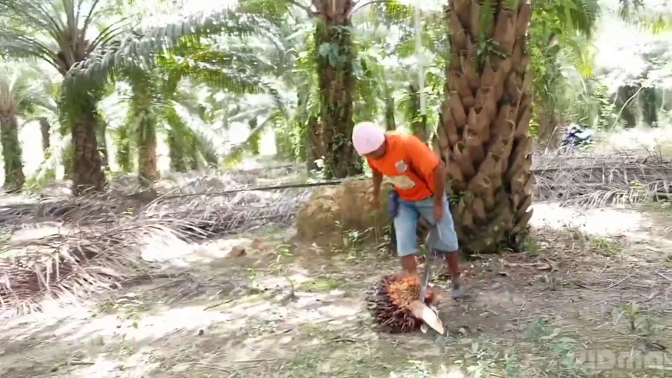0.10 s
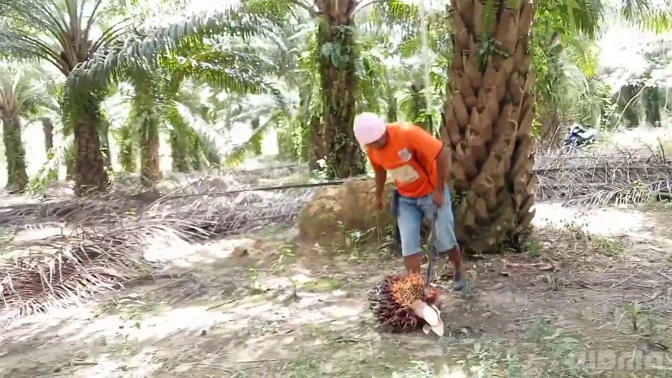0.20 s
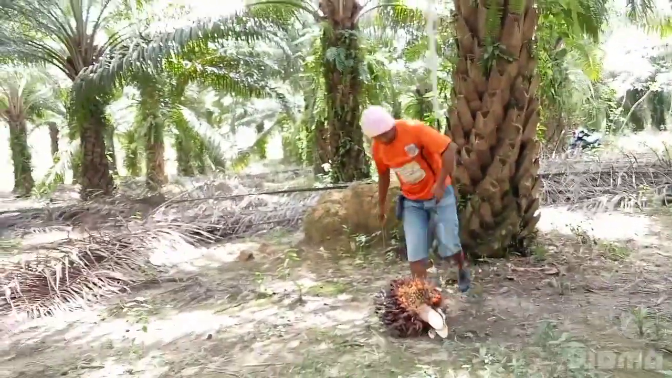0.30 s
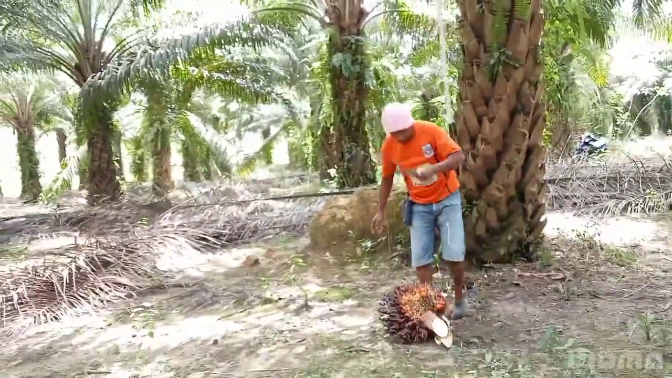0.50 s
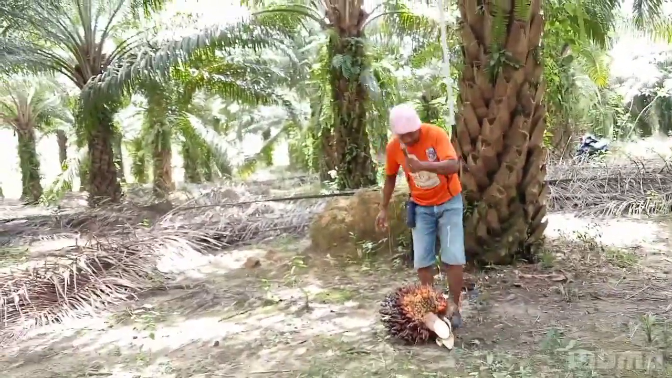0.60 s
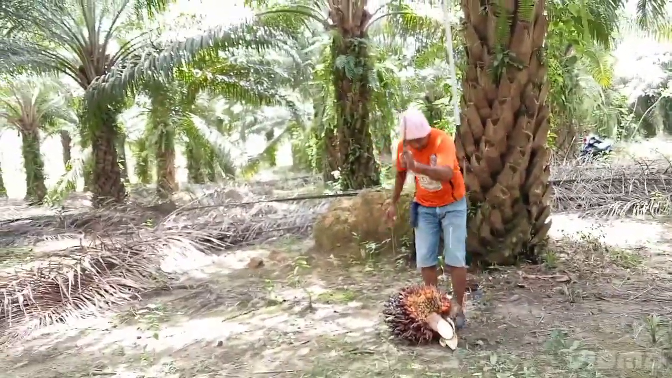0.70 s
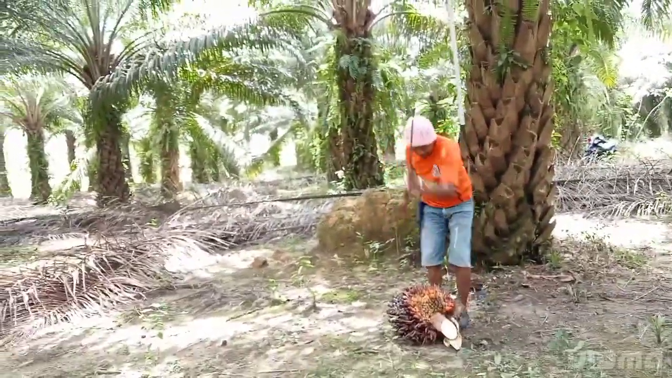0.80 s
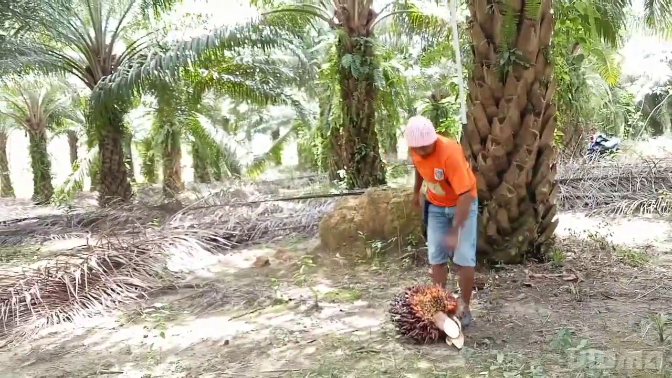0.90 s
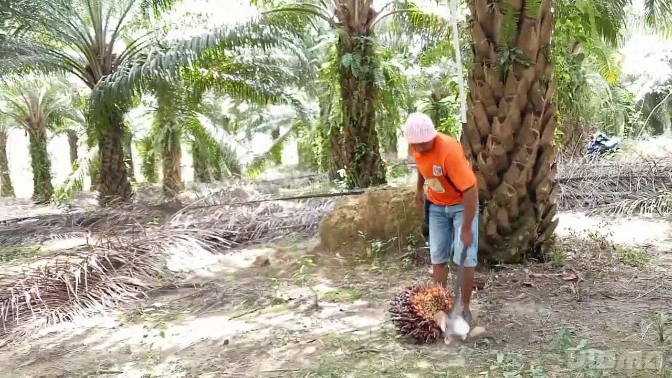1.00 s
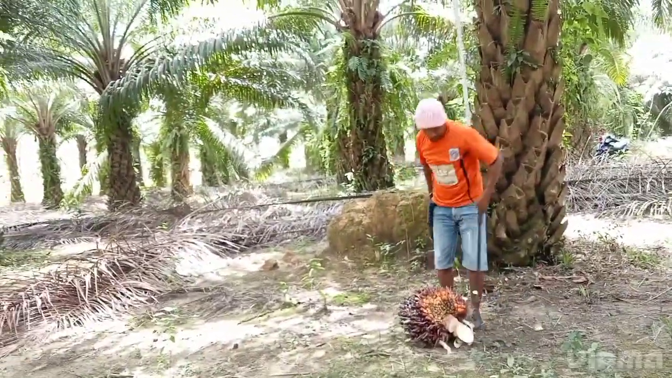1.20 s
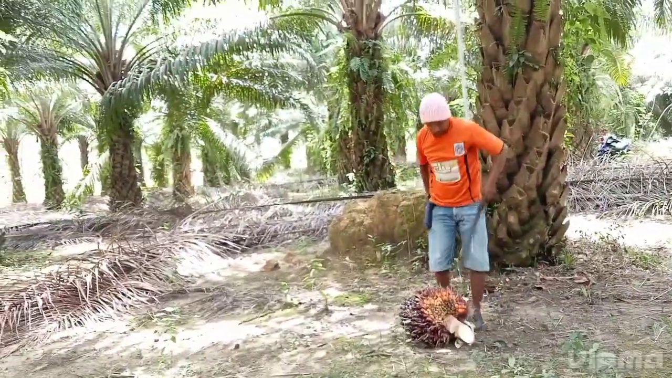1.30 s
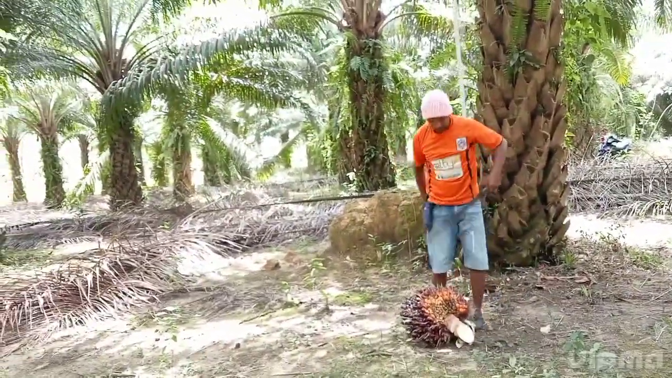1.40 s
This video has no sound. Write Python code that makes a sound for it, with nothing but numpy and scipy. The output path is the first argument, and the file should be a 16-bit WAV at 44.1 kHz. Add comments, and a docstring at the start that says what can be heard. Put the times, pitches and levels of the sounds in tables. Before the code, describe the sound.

A tiny tick and scuff, then a loud tearing chop with scattered echoes off trunks; light scuffs, then a second, woodier chop. High buzzing insects dip briefly afterwards, over a distant idling engine and low rumble.

```python
"""Insects drone high over a far engine and faint rumble and hiss, all made of noise bands and sine orders.
A small tick and one soft scuff lead to a harvester's first chop into a palm fruit bunch's stalk.
The long-poled blade tears fibres (noise burst), rings and thocks (decaying sines); the trunks scatter it back.
More scuffs come between and after the chops; the second chop has a weaker crack but a louder thock.
Then the insects are ducked briefly by the recorder's gain, and a thin, wavering whistle fades."""
import sys
import numpy as np
from scipy import signal
from scipy.fft import rfft, irfft
from scipy.io import wavfile
from scipy.ndimage import uniform_filter1d

SR = 44100
rng = np.random.default_rng(int(sys.argv[2]) if len(sys.argv) > 2 else 0)


def master_out(mix):
    """Clip the mix to full scale and print it as 16-bit PCM to the path in sys.argv[1]."""
    frames = np.transpose(np.atleast_2d(mix))
    ceiling = np.clip(frames, -1, 1)
    pcm = np.round(ceiling * 32767).astype(np.int16)
    wavfile.write(sys.argv[1], SR, pcm)


N = 63945

# chops: t/s, crack level/dB, crack length/s, crack tilt/(dB/octave), blade f/Hz, blade level/dB,
# thock and bunch delay/s, thock f/Hz, thock level/dB, pole gain/dB, scatter gain/dB
CHOP_EVENTS = [(0.2075, 1.5, 0.0074, -0.42, 3275, -9.5, 0.00065, 517, -18, 0.5, 2.5),
               (1.1268, -2.5, 0.0074, -0.54, 3387, -8.5, 0.00339, 610, -8, -2, 0)]
# tearing fibres, before tilt and chop level: f/Hz, density/(dB/Hz)
CRACK_SPECTRUM = [(90, -71.5), (150, -62.5), (400, -51.5), (800, -65), (1300, -54), (2000, -59.5),
                  (3300, -49), (4100, -63), (5400, -74), (6500, -63.5), (7600, -54), (10000, -59),
                  (12500, -61.5), (15000, -54.5)]
# modes of the fruit bunch: f/Hz, level/dB, T60/s
BUNCH_MODES = [(139, -37.5, 0.11), (293.6, -28, 0.13), (455.3, -25.5, 0.065), (748, -38.5, 0.11)]
# modes of the long pole, before spread and chop gain: f/Hz, level/dB, T60/s
POLE_MODES = [(1185, -44, .2), (1400, -46, .18), (1686, -46, .3), (2010, -48, .3), (2284, -47, .3),
              (2420, -47, .3), (2676, -38, .36), (2858, -43, .45), (3010, -45, .45), (3068, -45, .45)]
# echoes off trunks and fronds, before gains: f/Hz, density/(dB/Hz)
SCATTER_SPECTRUM = [(100, -81), (300, -68), (700, -69), (1200, -70), (1900, -62.5), (2800, -62),
                    (3400, -62.5), (4200, -73.5), (5400, -82.5), (7600, -67.5), (10000, -80.5),
                    (12500, -82.5), (15000, -77.5)]
# decay of those echoes: f/Hz, T60/s
SCATTER_DECAY = [(200, 0.16), (600, 0.2), (1400, 0.11), (3000, 0.31), (7500, .27), (14000, 0.29)]
# long wash from deep in the grove, before scatter gain: f/Hz, density/(dB/Hz)
WASH_SPECTRUM = [(300, -88), (1200, -88), (2000, -75.5), (2900, -70.5), (3500, -74), (4400, -85),
                 (5500, -91), (8000, -84), (13000, -101)]
# light tick of the tool: t/s, f/Hz, level/dB
TICK_EVENTS = [(0.148, 2970, -24)]
# snap of the tick, shape only: f/Hz, relative density/(dB/Hz)
SNAP_SPECTRUM = [(400, -102), (1300, -78), (3400, -96), (5000, -112), (8000, -102), (15000, -109)]
# scuffs on dry ground: centre t/s, Gaussian width/s, rustle gain/dB, thud level/dB
SCUFF_EVENTS = [(0.184, 0.024, 2.5, -55), (0.332, 0.009, 2.5, -51.5), (.415, 0.0059, -1.5, -80),
                (.76, 0.029, -3.5, -70), (1.095, 0.022, -5.5, -65), (1.215, 0.027, 6.5, -73),
                (1.35, 0.063, -8.5, -67)]
# rustle of a scuff, before its gain: f/Hz, density/(dB/Hz)
RUSTLE_SPECTRUM = [(200, -111.5), (600, -82.5), (1100, -91.5), (2400, -93.5), (3300, -84), (4500, -106),
                   (9000, -112)]
# thin far whistle: start t/s, end t/s, f/Hz, starting level/dB
WHISTLE_EVENTS = [(1.225, 1.405, 3406, -46.5)]
# insect chorus, before recorder gain: f/Hz, density/(dB/Hz)
CHORUS_SPECTRUM = [(5600, -120), (6050, -107), (6450, -91.5), (6750, -88), (7100, -74.5), (7450, -74.5),
                   (7900, -79.5), (8250, -99), (9500, -108), (11500, -124)]
# octave of the chorus, before recorder gain: f/Hz, density/(dB/Hz)
OCTAVE_SPECTRUM = [(12000, -122), (13200, -106), (13900, -102), (14600, -93), (15200, -89.5), (15600, -106)]
# recorder gain as heard on the insects, dipping after the second chop and recovering: t/s, gain/dB
RECORDER_GAIN = [(0, 1), (.25, 0.5), (.34, -1), (.5, 0.2), (1.08, 0.5), (1.2, -3), (1.29, -4.5), (1.36, .5),
                 (1.45, 2)]
# far idling engine: multiple of firing rate, level/dB
ENGINE_ORDERS = [(5, -61.5), (6, -63), (7, -64), (8, -65), (9, -68), (10, -69), (11, -63), (12, -61),
                 (14, -71)]
# distant rumble and air: f/Hz, density/(dB/Hz)
AIR_SPECTRUM = [(25, -96), (45, -96), (65, -82.5), (85, -78.5), (115, -84), (175, -87), (240, -90),
                (400, -95), (600, -98), (1100, -102), (2200, -99), (3300, -97), (4200, -109), (5200, -119),
                (12000, -121)]

CRACK_ATTACK_S, CRACK_RELEASE_S, CRACK_GRAIN_DB = 0.001, 0.0012, -0.5
BLADE_RISE_S, BLADE_T60_S = 0.0024, 0.012
THOCK_RISE_S, THOCK_T60_S = 0.0014, 0.034
THOCK_SHARP_RATIO, THOCK_SETTLE_S = 0.66, 0.0018  # fractional excess pitch at onset, its time constant
BUNCH_RISE_S, POLE_RISE_S, POLE_SPREAD_DB = 0.0078, 0.024, 5.5
SCATTER_START_S, SCATTER_PEAK_S, SCATTER_EARLY_DB = 0.0095, 0.039, -4
SCATTER_GRAIN_DB, SCATTER_GRAIN_HZ, WASH_T60_S = 2.5, 400, 0.75
TICK_T60_S, TICK_SNAP_DB, TICK_TAIL_DB = 0.0021, -5, -22  # snap and tail relative to tick level
THUD_HZ, THUD_WIDTH_HZ = 273, 71
WHISTLE_FADE_S, WHISTLE_SAG_DB_PER_S, WHISTLE_WAVER_HZ = 0.025, 40, 10.5
THROB_HZ, BUZZ_HZ = 27.8, 111.2
THROB_DEPTH, BUZZ_DEPTH, OCTAVE_BUZZ_DEPTH = 0.19, 0.1, 0.34
NEAR_HZ, NEAR_WIDTH_HZ, NEAR_PULSE_HZ = 7132, 25, 79  # one nearer insect
NEAR_DB, NEAR_PULSE_DEPTH = -51, 0.94  # level before recorder gain
FIRING_HZ, ENGINE_WAVER_DB = 15.2, 3
LOW_CUT_HZ, CUTOFF_HZ = 41, 15350


def from_db(db):
    """Decibels to amplitude gain."""
    return 10 ** (np.asarray(db) / 20)


def rms_one(x):
    """Scale to an rms of one."""
    return x / np.sqrt(np.mean(x ** 2) + 1e-20)


def since(s):
    """Seconds since a moment, at every sample."""
    return np.arange(N) / SR - s


def at_hz(points, hz):
    """Read a table on a log-frequency axis."""
    f, v = np.transpose(points)
    return np.interp(np.log(np.maximum(hz, 1)), np.log(f), v)


def shaped_noise(spectrum):
    """Random-phase noise with a spectrum in dB/Hz, falling 24 dB/octave outside the table."""
    hz = np.fft.rfftfreq(N, 1 / SR) + 1
    lowest_hz, highest_hz = spectrum[0][0], spectrum[-1][0]
    skirts = np.minimum(1, np.minimum(hz / lowest_hz, highest_hz / hz)) ** 4
    phases = np.exp(2j * np.pi * rng.random(len(hz)))
    return irfft(phases * skirts * from_db(at_hz(spectrum, hz)), N) * np.sqrt(N * SR / 2)


def narrow_noise(hz, width_hz):
    """Random-phase noise in one resonance, width at half amplitude; rms 1."""
    f = np.fft.rfftfreq(N, 1 / SR)
    phases = np.exp(2j * np.pi * rng.random(len(f)))
    resonance = 1 / (1 + (2 * (f - hz) / width_hz) ** 2)
    return rms_one(irfft(phases * resonance, N))


def grain(db, width_hz):
    """Random flutter of level, rms swing in dB; gain rms 1."""
    return rms_one(from_db(db * narrow_noise(0, width_hz)))


def pulsing(hz, depth):
    """Beat of level whose rate wanders by 1 % rms; gain rms 1."""
    rate_hz = hz * (1 + 0.01 * narrow_noise(0, 10))
    turns = np.cumsum(rate_hz) / SR + rng.random()
    return rms_one(np.exp(depth * np.cos(2 * np.pi * turns)))


def struck(t, rise_s, t60_s):
    """Envelope: quarter-sine rise, then exponential decay."""
    t = np.maximum(t, 0)
    rise = np.sin(np.pi / 2 * np.minimum(t / rise_s, 1))
    return rise * from_db(-60 * np.maximum(t - rise_s, 0) / t60_s)


def chops():
    """The blade bites, rings and thumps into the stalk; the pole rings on and the grove answers."""
    out = 0
    for (s, crack_db, length_s, tilt_db, blade_hz, blade_db,
         delay_s, thock_hz, thock_db, pole_db, scatter_db) in CHOP_EVENTS:
        t = since(s)
        bite = from_db(crack_db) * crack(t, length_s, tilt_db) + from_db(blade_db) * blade(t, blade_hz)
        body = from_db(thock_db) * thock(t - delay_s, thock_hz) + bunch(t - delay_s)
        answer = from_db(pole_db) * pole(t) + from_db(scatter_db) * grove(t)
        out = out + bite + body + answer
    return out


def crack(t, length_s, tilt_db):
    """Tearing fibres: a short noise burst of evened strength, tilted about 2 kHz."""
    tilted = [(hz, db + tilt_db * np.log2(hz / 2000)) for hz, db in CRACK_SPECTRUM]
    tear = shaped_noise(tilted)
    local_rms = np.sqrt(np.abs(uniform_filter1d(tear ** 2, size=128)) + 1e-18)
    even_tear = tear * np.std(tear) / local_rms
    attack = np.clip(t / CRACK_ATTACK_S, 0, 1)
    release = np.exp(-np.maximum(t - length_s, 0) / CRACK_RELEASE_S)
    return even_tear * grain(CRACK_GRAIN_DB, 3000) * attack * release


def blade(t, hz):
    """The blade's short ring: one damped mode."""
    return np.sin(2 * np.pi * hz * t) * struck(t, BLADE_RISE_S, BLADE_T60_S)


def thock(t, hz):
    """The stalk's hollow note, starting sharp and sinking in pitch as the blade beds in."""
    t = np.maximum(t, 0)
    extra_s = THOCK_SHARP_RATIO * THOCK_SETTLE_S * (1 - np.exp(-t / THOCK_SETTLE_S))
    turns = hz * (t + extra_s)
    return np.sin(2 * np.pi * turns) * struck(t, THOCK_RISE_S, THOCK_T60_S)


def bunch(t):
    """Damped low modes of the heavy bunch."""
    return sum(from_db(db) * np.sin(2 * np.pi * hz * t) * struck(t, BUNCH_RISE_S, t60_s)
               for hz, db, t60_s in BUNCH_MODES)


def pole(t):
    """Damped high modes of the pole, their strengths redrawn at each chop."""
    spread_db = rng.normal(0, POLE_SPREAD_DB, len(POLE_MODES))
    return sum(from_db(db + extra_db) * np.sin(2 * np.pi * hz * t) * struck(t, POLE_RISE_S, t60_s)
               for (hz, db, t60_s), extra_db in zip(POLE_MODES, spread_db))


def grove(t):
    """Dense echoes from near trunks, dying band by band, and a long wash."""
    echoes = rfft(shaped_noise(SCATTER_SPECTRUM))
    hz = np.fft.rfftfreq(N, 1 / SR)
    centres_hz = np.geomspace(150, 14000, 9)
    late_s = np.maximum(t - SCATTER_PEAK_S, 0)
    near = 0
    # one-hot rows make overlapping triangular bands that sum to one
    for centre_hz, share in zip(centres_hz, np.eye(len(centres_hz))):
        band = irfft(echoes * at_hz(np.c_[centres_hz, share], hz), N)
        near = near + band * from_db(-60 * late_s / at_hz(SCATTER_DECAY, centre_hz))
    build = np.clip(t / SCATTER_PEAK_S, 0, 1)
    onset = np.clip(t / SCATTER_START_S, 0, 1) * from_db(SCATTER_EARLY_DB * (1 - build))
    near = near * onset * grain(SCATTER_GRAIN_DB, SCATTER_GRAIN_HZ)
    wash = shaped_noise(WASH_SPECTRUM) * build * from_db(-60 * late_s / WASH_T60_S)
    return near + wash


def ticks():
    """A small dry tick: a damped ping, a broad noise snap and a faint narrow-noise tail."""
    out = 0
    for s, hz, db in TICK_EVENTS:
        t = since(s)
        ping = np.sin(2 * np.pi * hz * t) * struck(t, 0.00081, TICK_T60_S)
        snap = from_db(TICK_SNAP_DB) * rms_one(shaped_noise(SNAP_SPECTRUM)) * struck(t, 0.0002, 0.0059)
        tail = from_db(TICK_TAIL_DB) * narrow_noise(hz, 2200) * struck(t, 0.0012, 0.041)
        out = out + from_db(db) * (ping + snap + tail)
    return out


def scuffs():
    """Brushes and bumps on dry litter: Gaussian swells of grainy rustle and low narrow noise."""
    rustle = shaped_noise(RUSTLE_SPECTRUM) * grain(2.6, 400)
    thud = narrow_noise(THUD_HZ, THUD_WIDTH_HZ)
    out = 0
    for s, width_s, rustle_db, thud_db in SCUFF_EVENTS:
        swell = np.exp(-0.5 * (since(s) / width_s) ** 2)
        out = out + swell * (from_db(rustle_db) * rustle + from_db(thud_db) * thud)
    return out


def whistles():
    """A nearly pure note: a sine of wavering pitch and level that fades."""
    out = 0
    for start_s, end_s, hz, db in WHISTLE_EVENTS:
        t = since(start_s)
        gate = np.clip(np.minimum(t, end_s - start_s - t) / WHISTLE_FADE_S, 0, 1)
        turns = np.cumsum(hz + WHISTLE_WAVER_HZ * narrow_noise(0, 60)) / SR
        level = from_db(db - WHISTLE_SAG_DB_PER_S * t) * grain(2.2, 60)
        out = out + gate * level * np.sin(2 * np.pi * turns)
    return out


def insects():
    """A throbbing, buzzing noise-band chorus with its octave, and one nearer pulsed singer."""
    chorus = shaped_noise(CHORUS_SPECTRUM) * pulsing(BUZZ_HZ, BUZZ_DEPTH)
    octave = shaped_noise(OCTAVE_SPECTRUM) * pulsing(BUZZ_HZ, OCTAVE_BUZZ_DEPTH)
    near_pulse = pulsing(NEAR_PULSE_HZ, NEAR_PULSE_DEPTH)
    near = from_db(NEAR_DB) * narrow_noise(NEAR_HZ, NEAR_WIDTH_HZ) * near_pulse
    recorder_gain = from_db(np.interp(since(0), *np.transpose(RECORDER_GAIN)))
    return recorder_gain * pulsing(THROB_HZ, THROB_DEPTH) * (chorus + octave + near)


def engine():
    """Far idling engine: sines at multiples of the firing rate, each wavering in level."""
    out = 0
    for order, db in ENGINE_ORDERS:
        turns = order * FIRING_HZ * since(0) + rng.random()
        out = out + from_db(db) * grain(ENGINE_WAVER_DB, 3.6) * np.sin(2 * np.pi * turns)
    return out


def air():
    """Distant rumble and faint hiss: steady shaped noise."""
    return shaped_noise(AIR_SPECTRUM)


def scene():
    """Sum of all sources, one channel."""
    mix = chops() + ticks() + scuffs() + whistles() + insects() + engine() + air()
    return mix[None]


def record(dry):
    """Thin the deep bass, round the highest peaks, cut the top."""
    low_cut = signal.butter(2, LOW_CUT_HZ, "high", fs=SR, output="sos")
    thinned = signal.sosfilt(low_cut, dry)
    rounded = 0.8 * np.tanh(thinned / 0.8)
    top_cut = signal.ellip(10, 0.2, 70, CUTOFF_HZ, fs=SR, output="sos")  # ripple, stopband in dB
    return signal.sosfilt(top_cut, rounded)


dry = scene()
out = record(dry)
master_out(out)
```